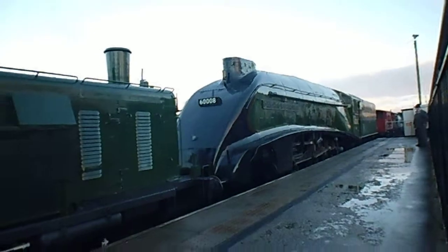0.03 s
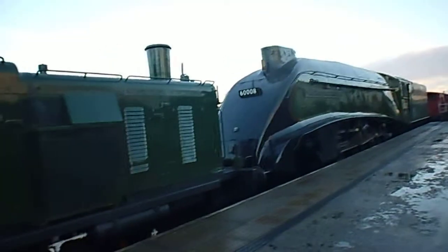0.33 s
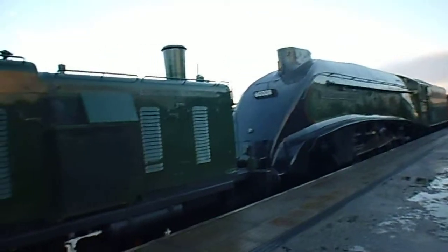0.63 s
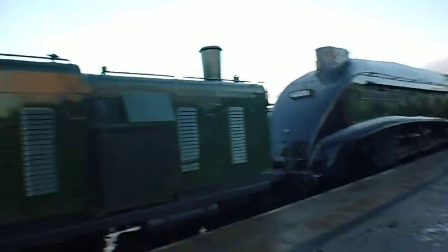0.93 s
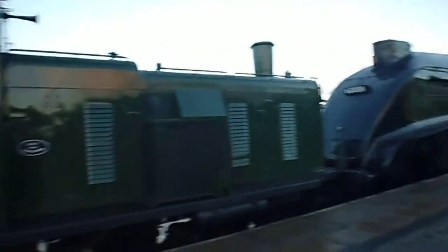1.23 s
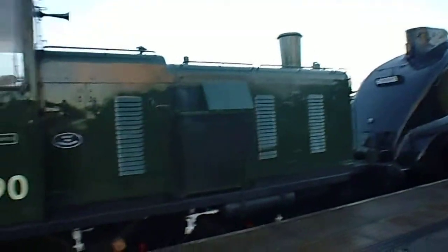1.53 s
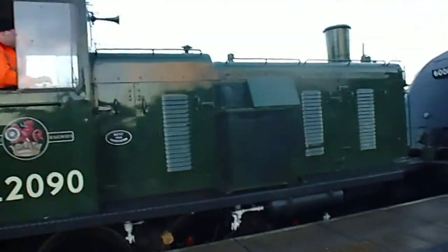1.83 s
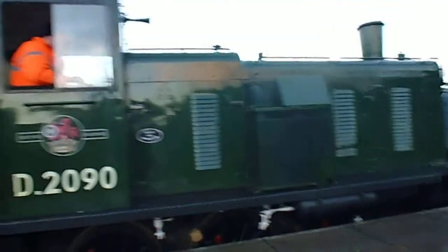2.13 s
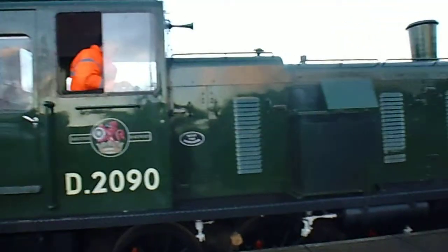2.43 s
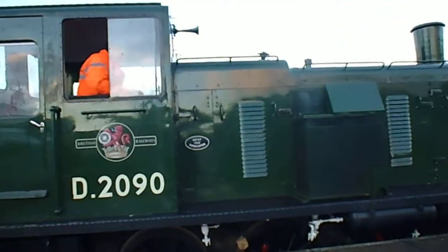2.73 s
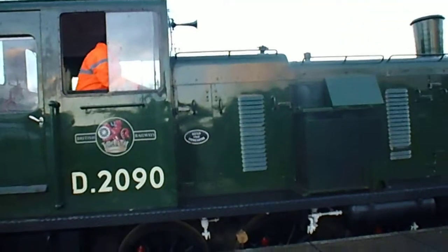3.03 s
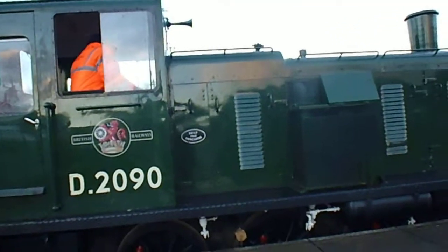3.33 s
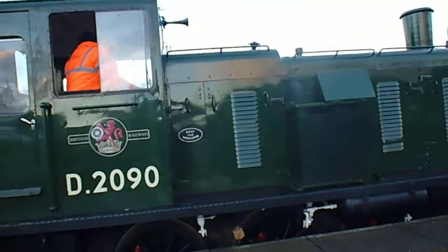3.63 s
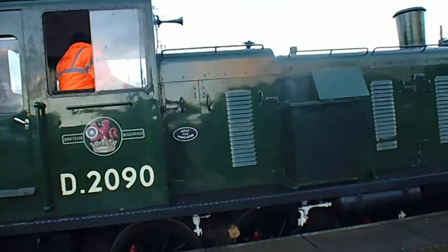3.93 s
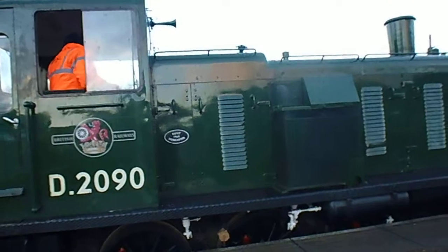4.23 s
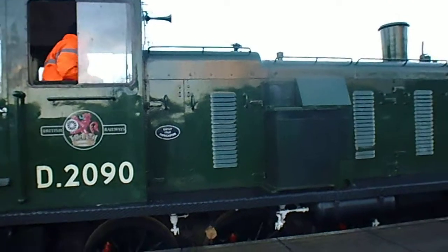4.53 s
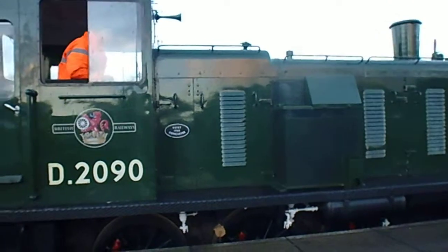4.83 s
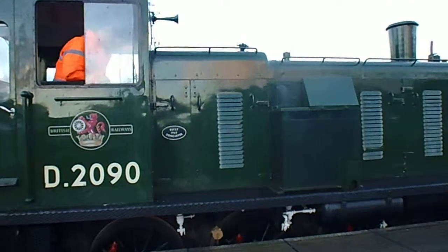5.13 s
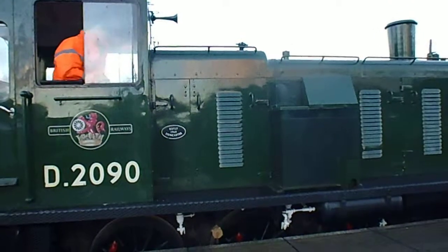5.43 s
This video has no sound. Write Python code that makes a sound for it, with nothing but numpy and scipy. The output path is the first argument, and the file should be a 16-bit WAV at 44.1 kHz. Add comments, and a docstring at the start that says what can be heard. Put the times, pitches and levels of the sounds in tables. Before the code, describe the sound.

A train horn gives two short toots over an idling diesel engine, then air bursts out in a long, fading hiss.

```python
"""Two toots of an air horn ring through a station, over an idling diesel shunter and a thin hiss of steam.
The horn's diaphragm swings up, gains overtones as it slaps its seat, and rings down; walls return echoes.
The toots push an automatic gain control far down; it holds, then lets the engine swell back, each firing
ringing the exhaust pipe and rattling the casing. Then the brake valve opens with a dull thump,
and a jet of air hisses through a resonant pipe, fading as the reservoir drains."""
import sys
import numpy as np
from scipy import signal
from scipy.fft import rfft, irfft
from scipy.io import wavfile
from scipy.ndimage import uniform_filter1d, minimum_filter1d

SR = 44100
rng = np.random.default_rng(int(sys.argv[2]) if len(sys.argv) > 2 else 0)


def to_wav(sig):
    """Store sig (one row per channel, or 1-D mono) as 16-bit WAV at the path in sys.argv[1].

    Samples outside -1..1 are clipped; the rate is SR.
    """
    pcm = np.clip(np.atleast_2d(sig), -1, 1) * 32767
    pcm = np.round(pcm).astype(np.int16)
    wavfile.write(sys.argv[1], SR, pcm.T)  # frames by channels


N = 245637
TIME = np.arange(N) / SR
FREQS = np.fft.rfftfreq(N, 1 / SR)
VALVE_OPENS_S = 3.311


def gain_of(db):
    """Amplitude ratio: tenfold for every 20 dB."""
    return 10 ** (np.asarray(db) / 20)


def unit_rms(x):
    """Normalisation to a mean power of 1."""
    return x / np.sqrt(np.mean(x ** 2) + 1e-20)


def curve_at(points, hz=FREQS):
    """Interpolation of (Hz, value) points on a logarithmic frequency axis."""
    point_hz, value = np.transpose(points)
    return np.interp(np.log(hz + 1), np.log(point_hz + 1), value)


def noise(spectrum_db):
    """Spectral shaping: white noise filtered bin by bin, then scaled to rms 1."""
    return unit_rms(irfft(rfft(rng.standard_normal(N)) * gain_of(spectrum_db), N))


def wander(rate_hz):
    """Random modulation of rms 1, with most of its power below rate_hz."""
    knots = rng.standard_normal(size=4096)
    return unit_rms(np.interp(2 * rate_hz * TIME, np.arange(len(knots)), knots))


def step(t, width_s):
    """A logistic transition from 0 to 1 around t = 0."""
    return (1 + np.tanh(t / width_s / 2)) / 2


def bump(at_s, width_s):
    """A Gaussian swell of height 1."""
    return np.exp(-((TIME - at_s) / width_s) ** 2)


def comb_ripple():
    """Interference: short reflections between train and platform ripple the spectrum (rms 1)."""
    delays_s = rng.uniform(.003, .018, size=24)
    return unit_rms(sum(np.cos(2 * np.pi * FREQS * delay) for delay in delays_s))


def horn_toot(strike_s, held_s, pitch_hz, level_db, sharp_hz=6.5, settle_s=.014, close_s=.0066,
              ring_s=.17, lead_s=.13, air_rise_s=.078):
    """Nonlinear oscillation: a diaphragm grows overtones as it slaps its seat, and chops the leaking air."""
    # Each row: harmonic number, level in dB.
    harmonics = [(1, -10.5), (2, -0.5), (3, -4.5), (4, -15.5), (5, -14), (6, -23), (7, -24.5), (8, -21),
                 (9, -28), (10, -27.5), (11, -29.5), (12, -26.5), (13, -32), (14, -28.5), (15, -26.5),
                 (16, -34), (17, -31.5), (18, -29.5), (19, -31), (20, -39.5)]
    # Spectrum of the leaking air. Each row: frequency in Hz, level in dB.
    air_spectrum = [(200, -19), (1000, 4.5), (2600, -7.5), (4300, 3), (5100, 2), (7500, -1.5), (8000, -19)]
    grow, sag, dulling, air_fall = 538.5, 16, 81, 259  # dB/s; dulling is per octave
    t = TIME - strike_s
    slap = step(t, .0029)
    shut_s = close_s * np.logaddexp(0, (t - held_s) / close_s)  # time since the valve shut
    build_db = -10 * np.log10(1 + gain_of(-2 * grow * np.clip(t, -.5, .5)))
    overshoot_db = 3 * bump(strike_s, .022)
    ring_down_db = 30 * (shut_s / ring_s) ** 2
    swing_db = level_db + build_db + overshoot_db - sag * np.clip(t, 0, held_s) - ring_down_db
    tilt_db = -19 * (1 - slap)  # per octave: nearly a sine before the strike
    hz = pitch_hz + sharp_hz * step(settle_s - t, .0029)  # the bell pulls the sharp diaphragm into tune
    phase = 2 * np.pi * np.cumsum(hz * (1 + .0007 * wander(160))) / SR
    sounding = (t > -lead_s) & (shut_s < .5)
    tone = np.zeros(N)
    for k, db in harmonics:
        octaves = np.log2(k)
        waver_db = .5 * wander(16)
        partial_db = db + swing_db + octaves * (tilt_db + waver_db - dulling * shut_s)
        shift = .46 * octaves * rng.standard_normal()  # near reflections scatter the phases
        tone[sounding] += gain_of(partial_db[sounding]) * np.sin(k * phase[sounding] + shift)
    tone /= np.linalg.norm([gain_of(db) for k, db in harmonics])
    leak_onset = np.clip((t + lead_s) / air_rise_s, 0, 1)
    leak = leak_onset * gain_of(-32 + 2 * slap - air_fall * shut_s)
    return tone + leak * noise(curve_at(air_spectrum)) * (1 + np.cos(phase))


def station_echoes(horn, tail_db=-25, taps_per_s=2000, smear_t60_s=.065, specular_db=-5):
    """Reflection and scattering: rough walls return smeared echoes over a thin diffuse tail."""
    # Echoes from walls and trains. Each row: delay in seconds, level in dB.
    echoes = [(.08, -30.5), (.153, -20.5), (.212, -25), (.28, -35.5), (.36, -37)]
    # Colour of all reflected sound. Each row: frequency in Hz, gain in dB.
    colour = [(400, -11.5), (800, -9), (1200, -6), (1600, -5.5), (2000, 2.5), (2400, 4), (2780, 6),
              (3200, -1), (4000, 2), (6000, 4), (8000, -0.5)]
    # Each row: frequency in Hz, reverberation time (60 dB of decay) in seconds.
    reverb_times = [(400, 0.95), (1000, 0.32), (2500, 0.89), (5000, 1), (8000, .55)]
    t = TIME[:SR]
    taps = rng.choice([-1., 1.], SR) * (rng.random(SR) < taps_per_s / SR) * (t > .02)
    hz, frame_s, spectra = signal.stft(taps, SR, nperseg=256)
    decay = gain_of(-60 * frame_s / curve_at(reverb_times, hz)[:, None])
    tail = signal.istft(spectra * decay, SR, nperseg=256)[1][:SR]
    response = gain_of(tail_db) * tail / np.linalg.norm(tail)
    for delay, db in echoes:
        scatter = rng.standard_normal(SR) * gain_of(-60 * abs(t - delay) / smear_t60_s)
        response += gain_of(db) * scatter / np.linalg.norm(scatter)
        response[round(delay * SR)] += gain_of(db + specular_db)
    reflected = signal.fftconvolve(horn, response)[:N]
    return irfft(rfft(reflected) * gain_of(curve_at(colour)), N)


def diesel_idle(firing_hz=28.61, exhaust_db=-31, clatter_db=-37, rumble_db=-32):
    """Impulse excitation: each firing rings the exhaust pipe and rattles the casing, over a low rumble."""
    # Each entry: a cylinder's strength in dB, in firing order.
    cylinders_db = [5.5, -1.5, -3, -0.5, -2.3, 0, -9, 1.2]
    # Exhaust pipe resonances. Each row: frequency in Hz, bandwidth in Hz, gain in dB.
    pipe_modes = [(54.5, 14, -6.5), (118.3, 7.9, 2), (151, 8.2, -8.5), (376, 25, -17)]
    # Spectra of the casing and the rumble. Each row: frequency in Hz, level in dB.
    casing_spectrum = [(100, -25.5), (170, 1.5), (214, -14.5), (304, -3), (415, -7.5), (475, -8.5),
                       (582, -17.5), (909, -14.5), (985, -12.5), (1170, -16.5), (1580, -17.5), (2250, -23),
                       (2790, -30), (4300, -31.5), (5590, -63.5), (9460, -120)]
    rumble_spectrum = [(8, -12), (19, -10.5), (30, 10), (48, -3.5), (66, -7), (85, 2), (150, -5),
                       (210, -19), (300, -44)]
    # Level of the idling engine over time. Each row: time in seconds, gain in dB.
    engine_level = [(0, 3.5), (1.4, 2), (2.3, 0.8), (3.1, 1), (3.9, 0.5), (4.7, -1.5), (5.1, 2), (5.57, 4)]
    cycles = np.cumsum(firing_hz * (1 + .004 * wander(1.75))) / SR
    cylinder_db = np.take(cylinders_db, cycles.astype(int) % len(cylinders_db))
    strength = gain_of(cylinder_db + 2 * wander(19))
    firings = np.diff(np.floor(cycles), prepend=0) * strength
    pipe = sum(gain_of(db) * 1j * FREQS * width / (hz ** 2 - FREQS ** 2 + 1j * FREQS * width)
               for hz, width, db in pipe_modes)
    muffler = 1 / (1 + (FREQS / 500) ** 4)
    exhaust = unit_rms(irfft(rfft(firings) * pipe * muffler, N))
    panel_db = 6 / (1 + ((FREQS - 988) / 15) ** 2)  # one panel of the casing sings
    casing = noise(curve_at(casing_spectrum) + panel_db + 2 * comb_ripple())
    knocks = .29 * strength * np.exp(-(cycles % 1) / .16)
    clatter = unit_rms(casing * (1 + knocks))
    rumble = noise(curve_at(rumble_spectrum)) * gain_of(2.3 * wander(17))
    idle = gain_of(exhaust_db) * exhaust + gain_of(clatter_db) * clatter + gain_of(rumble_db) * rumble
    return gain_of(np.interp(TIME, *np.transpose(engine_level))) * idle


def steam_leak(level_db=-44.5):
    """Turbulent noise: a steam engine standing behind leaks a thin, steady hiss."""
    # Each row: frequency in Hz, level in dB.
    hiss_spectrum = [(2000, -25), (4300, -13), (5100, -2.5), (5800, -1.5), (7400, -2), (8000, -13)]
    return gain_of(level_db) * noise(curve_at(hiss_spectrum) + 2 * comb_ripple())


def brake_flow_db(cracked_db=-14.5, opening_s=.06, hold_s=.23, drain_s=1.98, drained_db=-28):
    """Reservoir discharge: the flow, in dB re full flow, rises as the valve opens and then drains away."""
    t = np.maximum(TIME - VALVE_OPENS_S, 0)
    drained = 1 - np.exp(-np.maximum(t - hold_s, 0) / drain_s)
    return cracked_db * np.exp(-t / opening_s) + drained_db * drained


def brake_vent(roar_db=-29, pipe_db=-27.5, sizzle_db=-21, note_hz=5050, note_half_width_hz=250):
    """Jet noise through a resonant pipe: the roar and the nozzle's sizzle fade first as pressure falls."""
    # Spectra of the jet's three parts. Each row: frequency in Hz, level in dB.
    roar_spectrum = [(190, -25), (330, -6.5), (483, -0.5), (689, -5), (748, -13), (881, -3), (1110, -5),
                     (1430, -6), (1960, -7), (2270, -16), (2900, -14), (3770, -40.5), (6380, -120)]
    pipe_spectrum = [(1500, -26.5), (2100, -7.5), (2700, -14.5), (3400, -5), (4300, -3), (4900, -1.5),
                     (5400, -0.5), (6200, -8.5), (7500, -27.5)]
    sizzle_spectrum = [(4500, -34), (5600, -13), (6400, -1.5), (6900, 3), (7650, 3.5), (7950, -13.5)]
    # Vent pipe resonances. Each row: frequency in Hz, bandwidth in Hz, peak height in dB.
    pipe_modes = [(430, 70, 3), (1950, 90, 3), (3900, 70, 4), (4754, 40, 3), (4841, 40, 4), (4954, 55, 8.5),
                  (5150, 55, 10), (5829, 40, 4), (6156, 40, 3), (6480, 45, 5), (6740, 60, 5), (7027, 55, 4),
                  (7223, 35, 3), (7528, 70, 5)]
    # Reflections off frame, wheels and platform edge. Each row: delay in seconds, signed amplitude.
    reflections = [(.002182, -.16), (.002432, .08), (.003172, -.1), (.003334, -.08), (.003784, -.1),
                   (.004658, .09), (.005966, .07), (.007474, -.07), (.007774, -.09), (.008522, -.07),
                   (.00929, .08), (.01336, -.08)]
    # Swells and a dip of the pipe's hoarse note. Each row: centre and half length in seconds, gain in dB.
    flares = [(3.37, 0.03, 4), (4.16, .06, -1.5), (4.336, .035, 6.5), (4.722, 0.069, 4.5)]
    flow_db = brake_flow_db()
    modes_db = sum(db / (1 + (2 * (FREQS - hz) / width) ** 2) for hz, width, db in pipe_modes)
    paths = 1 + sum(share * np.exp(-2j * np.pi * FREQS * delay) for delay, share in reflections)
    colour_db = modes_db + 20 * np.log10(abs(paths)) + 1.7 * comb_ripple()
    surge_db = 3.5 * bump(3.58, .08)  # the roar swells once while the valve is wide open
    layers = [(roar_db + .85 * flow_db + surge_db, roar_spectrum),
              (pipe_db + .45 * flow_db, pipe_spectrum),
              (sizzle_db + flow_db, sizzle_spectrum)]
    jet = sum(gain_of(db) * noise(curve_at(spectrum) + colour_db) for db, spectrum in layers)
    # now and then the flow drives the pipe's strongest modes harder
    note = irfft(rfft(jet) / (1 + ((FREQS - note_hz) / note_half_width_hz) ** 4), N)
    flare_db = sum(db * bump(at, width) for at, width, db in flares)
    jet += note * (gain_of(flare_db) - 1)
    flutter = gain_of(-.13 * wander(40))
    onset = np.clip((TIME - VALVE_OPENS_S) / .0033, 0, 1)
    return jet * flutter * onset


def valve_thump(level_db=-15, thump_hz=125, rise_s=.0018, knock_hz=400, knock_db=-7):
    """A pressure transient: the first slug of air leaves with a dull, heavily damped push."""
    t = np.maximum(TIME - VALVE_OPENS_S, 0)
    push = np.sin(2 * np.pi * thump_hz * t) + gain_of(knock_db) * np.sin(2 * np.pi * knock_hz * t)
    envelope = t / rise_s * np.exp(1 - t / rise_s)
    return -gain_of(level_db) * push * envelope


def gain_control(x, limit_db=-10, hold_s=1.485, recovery_s=.23, near_db=6):
    """Limiting: the gain drops at once on loud sound, holds, then recovers."""
    power_db = 10 * np.log10(abs(uniform_filter1d(x ** 2, size=222)) + 1e-12)
    over_db = np.maximum(power_db - limit_db, 0)
    deepest_db = np.maximum.accumulate(over_db)
    # any peak near the highest so far restarts the hold
    over_db = np.where(over_db > deepest_db - near_db, deepest_db, over_db)
    span = round(hold_s * SR)
    held_db = -minimum_filter1d(-over_db, span, mode="constant", origin=(span - 1) // 2)
    release = np.exp(-TIME / recovery_s)
    duck_db = np.maximum.accumulate(held_db / release) * release
    return x / gain_of(uniform_filter1d(duck_db, size=64))


def low_pass(x, edge_hz):
    """Steep band limiting by a windowed sinc."""
    return signal.oaconvolve(x, signal.firwin(511, edge_hz, window=("kaiser", 9), fs=SR), "same")


def scene():
    """Superposition of the horn and its echoes, the engine, the steam and the brake air, in mono."""
    # Each row: the diaphragm's first strike in seconds, valve hold in seconds, pitch in Hz, level in dB.
    toots = [(0.021, 0.089, 395.7, 14.5), (0.945, 0.062, 395.2, 12)]
    horn = sum(horn_toot(*row) for row in toots)
    return (horn + station_echoes(horn) + diesel_idle() + steam_leak() + brake_vent() + valve_thump())[None]


def record(dry, sampling_hz=16000, edge_hz=9044):
    """Gain control, then spectral imaging: a low sampling rate mirrors the top of its band upwards."""
    # Roll-off of the mirror image. Each row: frequency in Hz, gain in dB.
    image_rolloff = [(8000, 4.5), (8200, -5), (8500, -15), (8750, -25.5), (9100, -38.5)]
    band = low_pass(gain_control(dry[0]), sampling_hz / 2)
    image = 2 * band * np.cos(2 * np.pi * sampling_hz * TIME)
    image = irfft(rfft(image) * gain_of(curve_at(image_rolloff)), N)
    return low_pass(band + image, edge_hz)[None]


dry = scene()
out = record(dry)
to_wav(out)
```